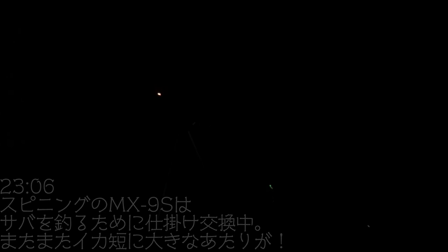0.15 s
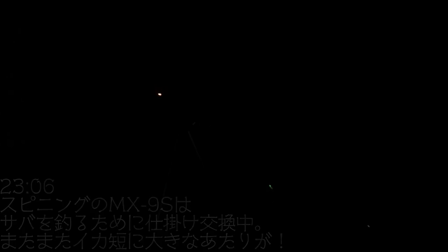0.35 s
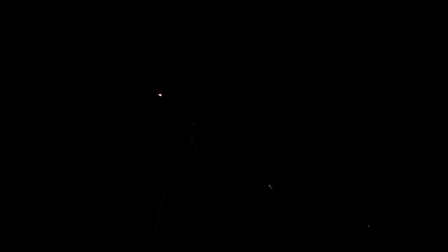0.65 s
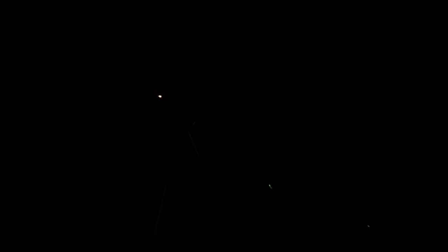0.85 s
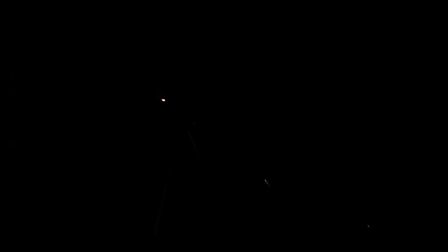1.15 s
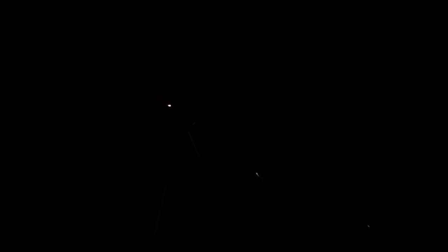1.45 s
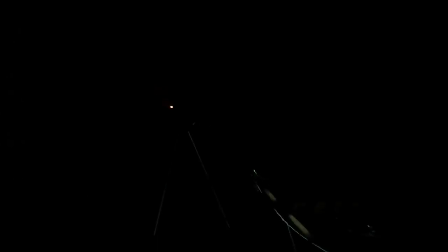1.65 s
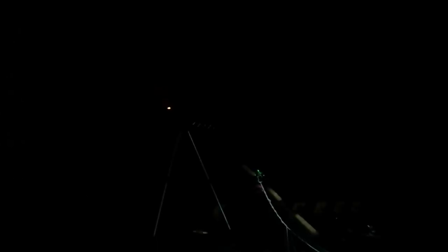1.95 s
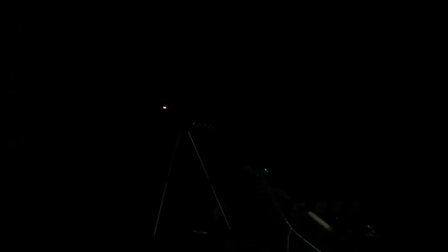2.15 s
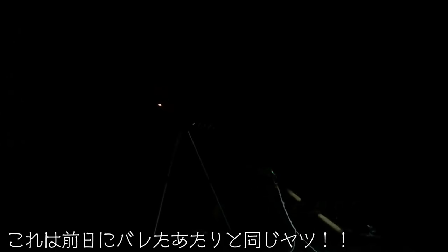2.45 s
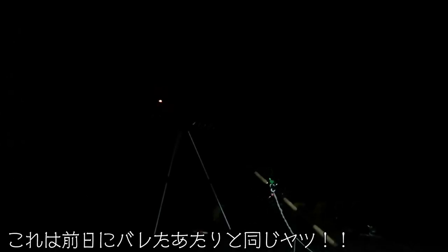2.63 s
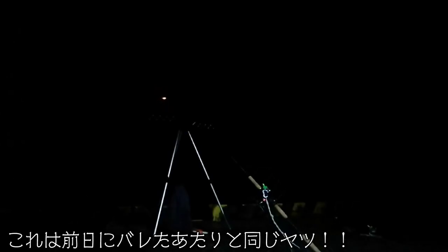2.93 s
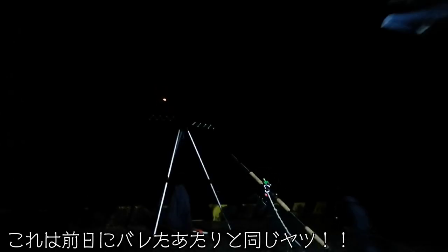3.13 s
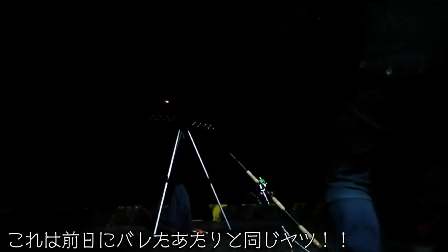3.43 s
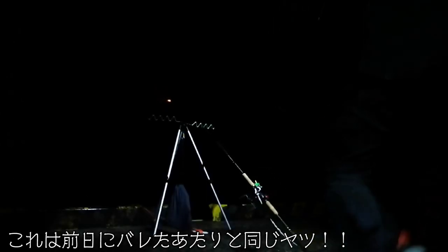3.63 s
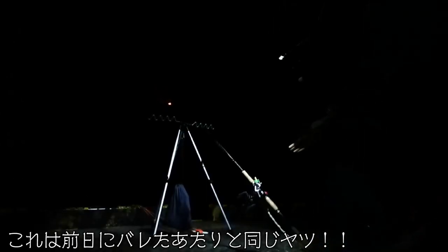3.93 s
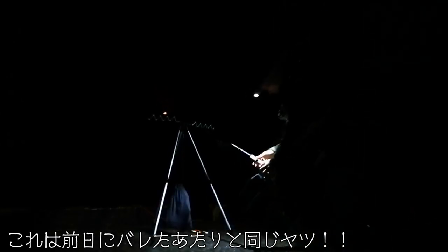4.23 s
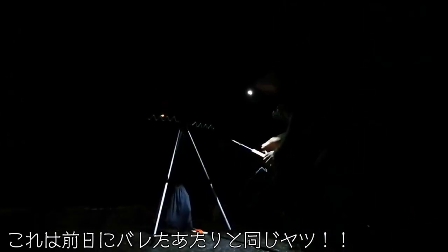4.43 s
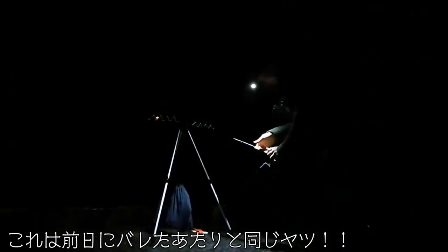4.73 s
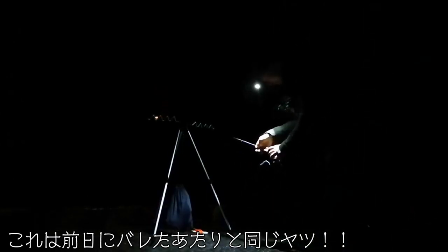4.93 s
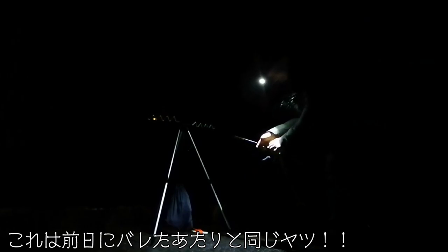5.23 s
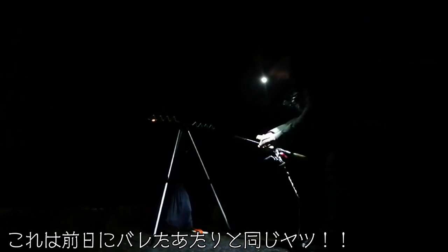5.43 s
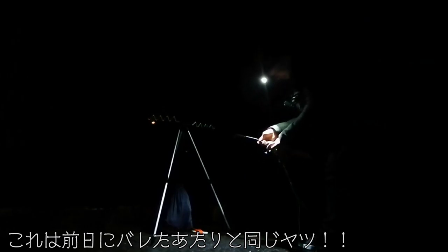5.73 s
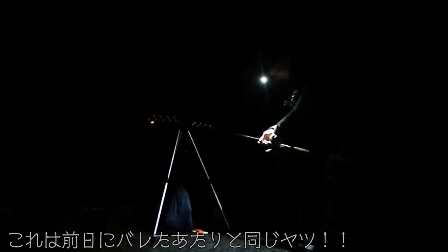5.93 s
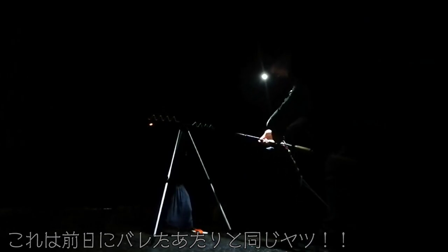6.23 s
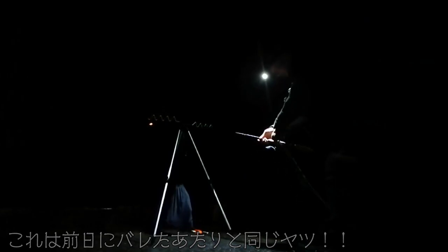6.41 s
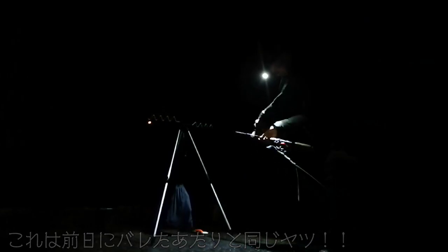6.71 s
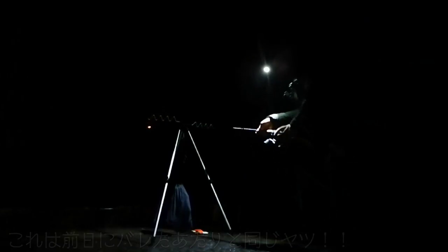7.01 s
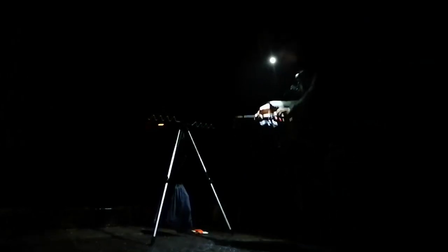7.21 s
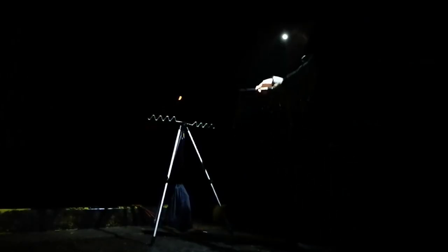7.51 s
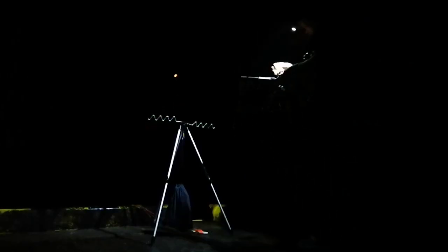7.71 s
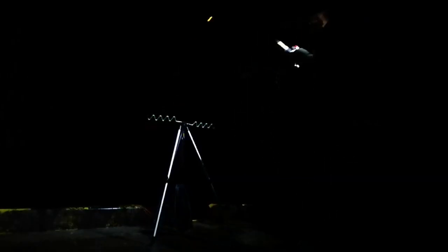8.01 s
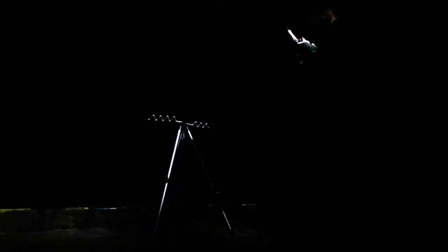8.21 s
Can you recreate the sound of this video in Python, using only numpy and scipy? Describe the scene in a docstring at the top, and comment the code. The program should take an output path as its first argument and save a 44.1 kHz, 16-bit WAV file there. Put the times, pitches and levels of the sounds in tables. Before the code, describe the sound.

Ticks from a fishing reel speed into a high, throbbing buzz while small bells rattle, ending in short spurts of clicks.

```python
"""By the water at night, a fish pulls line off a reel. The drag's spring clicks over the spool's teeth,
first one by one, then as an unevenly throbbing buzz that rings the frame, spool and rim. The angler
rises with a creak, steps over and lifts the trembling rod: its lower bell rattles with the run, its
higher bell jingles under the clapper. Clothes rustle and low puffs of wind pass over a faint hiss."""
import sys
import numpy as np
from scipy import signal
from scipy.fft import rfft, irfft, next_fast_len
from scipy.io import wavfile
from scipy.ndimage import uniform_filter1d, map_coordinates

SR = 44100
rng = np.random.default_rng(int(sys.argv[2]) if len(sys.argv) > 2 else 0)


def wav_record(signal):
    """Record a signal, one row per channel, as 16-bit PCM in the file named by sys.argv[1]."""
    frames = np.transpose(np.atleast_2d(signal))
    bounded = np.clip(frames, -1, 1)
    # unit amplitude maps onto the largest positive 16-bit level
    quanta = np.round(bounded * 32767).astype(np.int16)
    wavfile.write(sys.argv[1], SR, quanta)


N = 368805

# Resonances of the reel's parts. Each row: centre in Hz, width in Hz, gain in dB.
SPOOL_MODES = [(2794, 175, -5), (3350, 490, 1), (3448, 253, 7), (3740, 140, -0.5)]
RIM_MODES = [(4023, 457, -4.5), (4538, 490, -7.5), (4803, 190, -7), (5520, 360, -11.5)]
SPRING_MODES = [(7020, 500, -0.5), (7890, 470, -3), (8600, 510, -7)]
SPRING_TIP_MODES = [(9240, 255, 4), (10080, 1450, -5), (12300, 3200, -14.5), (14360, 490, -13.5)]
# How hard the running line shakes the rod. Each row: time in seconds, spool level in dB,
# lower bell against the spool in dB, pitch of that bell in Hz.
LINE_PULL = [(0.8, -49.5, -6, 3060), (1.12, -34.5, -4, 3030), (1.42, -35, -1.5, 3026), (1.66, -37, 3, 2952),
             (1.78, -45.5, 3.5, 3027), (2.06, -53, 2, 3000), (2.2, -51.5, 14.5, 2948),
             (2.5, -52.5, -2.5, 2995), (2.94, -42.5, -11, 3130), (3.02, -45.5, -15, 3117),
             (3.12, -41.5, -12, 3090), (3.3, -52, 0.5, 3020), (3.52, -53, -2, 3004), (3.66, -44, -9, 3045),
             (3.74, -39.5, -5, 3079), (4.11, -41, 3.5, 3029), (4.29, -54.5, 13.5, 3014),
             (4.35, -54.5, 1, 2952), (5.24, -56, 2, 2965), (5.84, -50.5, -9.5, 3000), (5.9, -49, 2, 3150),
             (6.2, -56, 9, 3136), (6.5, -52.5, 5.5, 3149), (6.82, -54, -1, 3150), (6.89, -70, 3, 3150)]


def amp(db):
    """Gain of a level in dB."""
    return 10 ** (np.asarray(db) / 20)


def unit(x):
    """x at rms 1."""
    return x / np.sqrt(np.mean(x ** 2) + 1e-20)


def curves(rows, outside=None):
    """One value per sample for each column after the time."""
    s, *cols = np.transpose(rows)
    return np.array([np.interp(np.arange(N) / SR, s, c, outside, outside) for c in cols])


def wobble(rate):
    """A smooth random curve, rate knots a second."""
    return map_coordinates(rng.standard_normal(int(N * rate / SR) + 4), [np.arange(N) * rate / SR])


def swell(start, length, lean):
    """One smooth rise and fall, peak 1; lean under 1 peaks early."""
    u = np.clip((np.arange(N) / SR - start) / length, 0, 1)
    return np.sin(np.pi * u ** lean) ** 2


def even_hits(bouts, scatter_db):
    """Evenly spaced hits of scattered size. Each row out: seconds, dB, the bout's further columns."""
    hits, chance = [], rng.standard_normal((len(bouts), 30))
    for (first, last, rate, first_db, last_db, *rest), scatter in zip(bouts, chance):
        count = round((last - first) * rate) + 1
        times, levels = np.linspace(first, last, count), np.linspace(first_db, last_db, count)
        hits += [(s, db + scatter_db * z, *rest) for s, db, z in zip(times, levels, scatter)]
    return hits


def filtered(x, response):
    """x through a complex frequency response."""
    size = next_fast_len(N + SR // 2)
    return irfft(rfft(x, size) * response(np.fft.rfftfreq(size, 1 / SR)), size)[..., :N]


def resonant(x, modes):
    """x through parallel resonances of alternating polarity."""
    return filtered(x, lambda f: sum((-1) ** k * amp(db) * 1j * f * w / (hz * hz - f * f + 1j * f * w)
                                     for k, (hz, w, db) in enumerate(modes)))


def steep(x, modes):
    """Resonances with dark skirts: a broad band around them cuts the rest, twice."""
    low, high = modes[0][0], modes[-1][0]
    band = [(np.sqrt(low * high), 1.6 * (high - low) + 600, 0)]
    return resonant(resonant(resonant(x, modes), band), band)


def hiss(spectrum):
    """Noise of rms 1 with the given spectrum."""
    hz, db = np.transpose(spectrum)
    white = rng.standard_normal(N)
    return unit(filtered(white, lambda f: amp(np.interp(np.log(f + 1), np.log(hz + 1), db))))


def patchy(x, depth_db):
    """Drifting colour: slow random patches of gain over time and frequency."""
    spectra = signal.stft(x, nperseg=512)[2]
    patches = uniform_filter1d(rng.standard_normal(spectra.shape), size=4, axis=0)
    patches = uniform_filter1d(patches, size=40, axis=1)
    return signal.istft(spectra * amp(depth_db * unit(patches)), nperseg=512)[1][:N]


def thud(hz, t60, q):
    """A burst of noise around one broad resonance, peak 1."""
    t = np.arange(SR // 6) / SR
    b, a = signal.iirpeak(hz, q, SR)
    burst = amp(-60 * t / t60) * rng.standard_normal(len(t))
    burst = signal.lfilter(b, a, signal.lfilter(b, a, burst))
    return burst / np.abs(burst).max()


def chatter(blows, t60, tail_db, tail_t60):
    """Each blow becomes a noisy burst of tiny bounces, with a weak longer rattle after it."""
    t = np.arange(SR // 10) / SR
    shape = (amp(-60 * t / t60) + amp(tail_db - 60 * t / tail_t60)) * (1 - np.exp(-t / 0.00029))
    return signal.fftconvolve(blows, shape)[:N] * rng.standard_normal(N)


def ringing(blows, pitch, t60):
    """One damped note of moving pitch, kicked at a chance phase by every blow; rms 1."""
    t = np.arange(SR // 8) / SR
    kicks = blows * np.exp(2j * np.pi * rng.random(N))
    rings = signal.fftconvolve(kicks, amp(-60 * t / t60) * (1 - np.exp(-t / 0.00039)) ** 2)[:N]
    return unit(np.real(rings * np.exp(2j * np.pi * np.cumsum(pitch) / SR)))


def night_hiss():
    """Faint stereo hiss that fades in, then slowly gets quieter."""
    # Colour of the hiss. Each row: frequency in Hz, relative level in dB.
    colour = [(18, -35), (30, -11), (108, -14.5), (126, -13.5), (576, -16), (656, -9), (1360, -15.5),
              (1520, -15), (1730, -11.5), (3880, -8), (15500, -31.5)]
    # The fade of the hiss. Each row: time in seconds, level in dB.
    fade = [(0, -85.5), (.3, -80.5), (1.5, -65.5), (8.36, -79)]
    mid = amp(curves(fade)[0]) * hiss(colour)
    side = amp(-92) * hiss(colour)
    return np.array([mid + side, mid - side])


def wind():
    """Three low, fluttering puffs near the end."""
    # The puffs. Each row: start in seconds, length in seconds, level in dB.
    puffs = [(7.257, 0.17, -66.5), (7.397, 0.17, -70), (7.644, 0.24, -55)]
    # Colour of the buffeting. Each row: frequency in Hz, relative level in dB.
    colour = [(12, -41.5), (20, -10), (75, 0), (114, -7), (203, -23), (230, -31.5), (400, -32.5),
              (520, -71), (880, -120)]
    gusts = sum(amp(db) * swell(s, length, lean=0.71) for s, length, db in puffs)
    flutter = amp(4.5 * wobble(30))
    return gusts * unit(flutter * hiss(colour))


def clothes():
    """The angler's clothes rustle over a low rumble of movement."""
    # The movement. Each row: time in seconds, rustle in dB, rumble in dB.
    movement = [(0.3, -110, -102), (0.54, -77.5, -87), (0.78, -75, -88), (1.01, -59.5, -78),
                (1.2, -59, -67.5), (1.44, -57, -73), (1.62, -72, -81.5), (2.4, -73, -86), (2.65, -70, -74),
                (2.78, -71, -81), (3.74, -71, -76), (4.21, -70.5, -84), (5.69, -73.5, -80),
                (6.69, -71.5, -81.5), (7.0, -84, -89), (7.184, -70, -89), (7.374, -79, -85),
                (8.36, -89, -90.5)]
    # Colours of rustle and rumble. Each row: frequency in Hz, relative level in dB.
    cloth_colour = [(88, -32), (150, -9.5), (286, -11.5), (369, -3), (985, 0.5), (1080, 0.5), (1600, 3.5),
                    (2080, -20), (3520, -120)]
    rumble_colour = [(12, -28), (20, 10.5), (38, -12.5), (91, -13), (226, -9), (300, -7.5), (390, -34.5),
                     (660, -120)]
    rustle, rumble = amp(curves(movement))
    return rustle * patchy(hiss(cloth_colour), depth_db=1.0) + rumble * hiss(rumble_colour)


def steps_and_tackle():
    """Steps and bumps knock over a low thump; the tackle snaps sharply."""
    # Steps and bumps. Each row: start in seconds, peak in dB, centre in Hz, t60 in seconds, thump in dB.
    knocks = [(1.116, -38.5, 850, 0.08, -43.5), (1.333, -43.5, 1324, 0.06, -72),
              (1.363, -41.5, 390.5, 0.054, -78), (1.466, -43, 820, 0.096, -68),
              (1.519, -50, 380, 0.09, -64), (1.884, -37.5, 790, 0.1, -53.5),
              (2.593, -42, 617, 0.056, -44.5), (2.719, -42, 1396, 0.08, -61),
              (2.753, -61, 774.7, 0.0538, -69), (2.946, -53, 1050, 0.13, -83),
              (3.182, -49.5, 1303, 0.09, -52), (3.726, -61, 297, 0.051, -55.5),
              (4.289, -77, 713, 0.06, -66)]
    # Snaps of tackle. Each row: start in seconds, peak in dB, centre in Hz.
    snaps = [(2.726, -38, 6300), (3.7428, -19.5, 2516), (3.7408, -25.5, 6023), (7.2008, -23, 5670),
             (7.204, -24.5, 8560), (7.26, -25, 4172)]
    out = np.zeros(N + SR)
    for s, db, hz, t60, thump_db in knocks:
        knock = amp(db) * thud(hz, t60, q=1.42) + amp(thump_db) * thud(hz=248, t60=0.11, q=0.9)
        out[round(s * SR):][:len(knock)] += knock
    for s, db, hz in snaps:
        snap = amp(db) * thud(hz, t60=0.013, q=3.2)
        out[round(s * SR):][:len(snap)] += snap
    return out[:N]


def creak():
    """A short sagging tone with a strong third partial, as the angler rises."""
    # The creak's glide. Each row: time in seconds, pitch in Hz, level in dB.
    glide = [(1.03, 336.6, -79), (1.04, 332, -51), (1.07, 296, -56.5), (1.11, 274, -53), (1.125, 290, -99)]
    pitch, db = curves(glide)[0], curves(glide, outside=-140)[1]
    phase = 2 * np.pi * np.cumsum(pitch) / SR
    return amp(db) * (np.sin(phase) + amp(-14) * np.sin(2 * phase) + amp(-3) * np.sin(3 * phase))


def rod_tremble():
    """Envelope of the rod's jolts: each swells quickly and dies away."""
    # Bouts of jolts. Each row: first and last time in seconds, jolts a second, first and last dB.
    bouts = [(1.038, 1.323, 24.5, -35, -45), (1.416, 1.4506, 29, -29, -29), (1.5136, 1.5888, 13, -54, -30),
             (1.6322, 1.8088, 22.6, -22, -30.5), (1.8427, 1.8821, 25, -23.5, -27),
             (1.948, 2.13, 22, -31, -41), (2.1909, 2.2653, 27, -41, -32.5),
             (2.311, 2.3555, 45, -29.5, -31.5), (2.3892, 2.591, 20, -39, -38),
             (2.6473, 2.6953, 21, -32.5, -32.5), (2.74, 2.794, 18, -48, -44),
             (2.8439, 2.9344, 22, -35, -26.5), (3.0583, 3.1543, 21, -43, -32.5),
             (3.214, 3.2644, 20, -53, -57), (3.7182, 3.8378, 16.7, -43, -25),
             (3.888, 4.0332, 20.6, -25, -28), (4.0701, 4.2944, 26.7, -24.5, -26),
             (5.9938, 6.2976, 23, -28.5, -30), (6.3928, 6.5094, 34, -35.5, -29.5),
             (6.56, 6.6867, 24, -47, -43), (6.7261, 6.8099, 24, -36, -54)]
    rise_s, lead_s = 0.01, 0.0046
    u = np.arange(SR // 8) / SR / rise_s
    s, db = np.transpose(even_hits(bouts, scatter_db=1.0))
    at = np.round(s * SR).astype(int) - round(lead_s * SR)
    return signal.fftconvolve(np.bincount(at, amp(db), N), (u * np.exp(1 - u)) ** 2)[:N]


def lower_bell(blows, jolts):
    """One note, part free and part muffled, tickled by the clicks and swelling with each jolt."""
    free_share = 0.63
    _, against_spool_db, pitch = curves(LINE_PULL)
    db = curves(LINE_PULL, outside=-140)[0] + against_spool_db
    free = ringing(blows, pitch + 35 * wobble(40), t60=0.035)
    muffled = ringing(blows, pitch + 70, t60=0.013)
    note = np.sqrt(free_share) * free + np.sqrt(1 - free_share) * muffled
    return resonant((amp(db) + amp(-9.5) * jolts) * note, modes=[(3144, 700, 0.0095)])


def higher_bell():
    """Every blow of the clapper rings the bell's modes anew and rasps."""
    # Blows of the clapper. Each row: start in seconds, strength in dB.
    strikes = [(5.8827, -7.5), (5.888, -15.5), (5.901, -19), (5.9093, -16), (5.9244, -17), (5.9447, -16),
               (5.9634, -23.5), (5.9844, -26), (6.0188, -22.5), (6.036, -27.5), (6.054, -23.5),
               (6.0886, -29.5), (6.118, -17.5), (6.1604, -43), (7.2042, -27.5), (7.2242, -19),
               (7.2293, -24), (7.2665, -30), (7.288, -28), (7.3104, -19), (7.3502, -38), (7.401, -41.5),
               (7.427, -40.5)]
    # The bell's modes. Each row: frequency in Hz, relative level in dB, t60 in seconds.
    modes = [(3860, -3.5, 0.035), (4120, 0.5, 0.099), (4040, -15.5, 0.11), (9940, -38, 0.16),
             (10500, -37.5, .12)]
    # The clapper's rasp. Each row: centre in Hz, width in Hz, gain in dB.
    rasp_bands = [(3700, 220, -11.5), (4177, 78, 9), (4930, 430, -9), (5780, 580, -15)]
    scatter_db, attack_s = 2.5, 0.003
    out, blows, t = np.zeros(N + SR), np.zeros(N), np.arange(SR // 3) / SR
    for s, db in strikes:
        ring = sum(amp(level + rng.normal(0, scatter_db) - 60 * t / t60)
                   * np.sin(2 * np.pi * (hz * t + rng.random())) for hz, level, t60 in modes)
        out[round(s * SR):][:len(t)] += amp(db - 3.5) * ring * (1 - np.exp(-t / attack_s))
        blows[round(s * SR)] = amp(db)
    rasp = chatter(blows, t60=0.07, tail_db=-10, tail_t60=0.28)
    return out[:N] + amp(-4) * steep(rasp, rasp_bands)


def drag_ticks():
    """Single teeth pass the spring as the spool creeps, then roll as it gathers speed."""
    # Single clicks. Each row: start in seconds, strength in dB.
    singles = [(0.2592, -41), (0.3166, -38), (0.3695, -40), (0.413, -36.5), (0.4463, -35.5), (0.476, -35.5),
               (0.5023, -36), (0.5244, -34.5), (0.5432, -36), (0.5594, -37.5), (0.5809, -32),
               (0.599, -36.5), (0.616, -36), (0.6333, -36), (0.6559, -32.5), (0.686, -34), (0.715, -34),
               (0.7385, -34), (6.8757, -37), (6.9034, -45), (6.9242, -45), (6.943, -41), (6.9594, -52),
               (6.98, -41.5), (7.5748, -38), (7.667, -35), (7.9848, -53)]
    # Rolls of clicks. Each row: first and last time in seconds, clicks a second, first and last dB,
    # extra drive of the spring in dB.
    rolls = [(0.756, 0.846, 66, -36.5, -38, -4), (0.8614, 0.8733, 84, -31, -30, -16),
             (0.8881, 0.9323, 68, -27, -29.5, -9), (7.1067, 7.1324, 78, -39, -31.5, -10.5),
             (7.1404, 7.1899, 121, -34, -26, -21.5), (7.5921, 7.6454, 94, -33, -36.5, -14)]
    single_spring_db = -7
    hits = [(s, db, single_spring_db) for s, db in singles] + even_hits(rolls, scatter_db=2.0)
    s, db, spring_db = np.transpose(hits)
    at = np.round(s * SR).astype(int)
    body = chatter(np.bincount(at, amp(db), N), t60=0.0081, tail_db=-12.5, tail_t60=0.075)
    spring = chatter(np.bincount(at, amp(db + spring_db), N), t60=0.0084, tail_db=-16.5, tail_t60=0.085)
    return (amp(7.5) * (steep(body, SPOOL_MODES) + steep(body, RIM_MODES))
            + amp(6.0) * steep(body, modes=[(3000, 380, 0)])
            + amp(8.5) * steep(spring, SPRING_MODES) + amp(-1) * steep(spring, SPRING_TIP_MODES))


def spool_teeth():
    """The running spool's teeth strike the spring: fast impulses of uneven timing and size."""
    # The run of the spool. Each row: time in seconds, clicks a second.
    spin = [(0.76, 68), (0.93, 72.6), (1.0, 135), (1.35, 179), (1.62, 257), (2.29, 314), (2.6, 241),
            (3.25, 209), (3.52, 150), (4.08, 297), (5.66, 345), (5.9, 260), (6.34, 280), (6.55, 394),
            (6.87, 330)]
    rate, = curves(spin)
    passing = np.flatnonzero(np.diff(np.floor(np.cumsum(rate) / SR)))
    jitter, size = rng.standard_normal((len(passing), 2)).T
    at = np.clip(passing + 0.05 * jitter * SR / rate[passing], 0, N - 1).astype(int)
    return np.bincount(at, amp(1.9 * size), N)


def buzz_flares(blows):
    """The buzz flares for a moment in one narrow band or another as the rod swings."""
    # Flares. Each row: start and length in seconds, first and last Hz, level in dB, t60 in seconds.
    flares = [(1.45, 0.38, 2280, 2100, -50.5, 0.035), (1.55, 0.64, 4280, 4200, -63, 0.026),
              (2.68, 0.53, 7100, 7050, -57, 0.011), (2.8, 0.5, 7600, 8500, -59.5, 0.0045),
              (3.0, .25, 4530, 4570, -49.5, 0.0076), (3.7, .35, 4500, 5040, -45.5, 0.0095),
              (3.75, .27, 6820, 7180, -53, 0.0056), (4.4, .5, 7390, 6700, -56, 0.005),
              (4.5, 0.53, 4120, 4363, -51.5, 0.029), (4.4, .32, 1784, 1762, -58.5, 0.045),
              (5.15, 0.38, 2054, 2055, -53.5, 0.023), (1.001, 0.43, 8000, 7660, -48, .004),
              (2.1, 0.37, 1030, 1270, -66.5, .02), (2.72, 0.16, 770, 756, -66, .03),
              (4.019, .2, 720, 690.3, -70, .03), (4.05, .13, 1140, 1140, -68.5, .03),
              (7.58, 0.12, 1100, 1290, -71.5, .015)]
    t, out = np.arange(N) / SR, np.zeros(N)
    for s, length, first_hz, last_hz, db, t60 in flares:
        pitch = np.interp(t, [s, s + length], [first_hz, last_hz])
        out += amp(db) * swell(s, length, lean=1.45) * ringing(blows, pitch, t60)
    return out


def drag_buzz(blows, jolts):
    """The clicks ring every part of the reel; the jolts press the spring harder on the teeth."""
    # The frame's resonances. Each row: centre in Hz, width in Hz, gain in dB.
    frame_modes = [(1707, 280, 3), (2410, 630, 8.5)]
    # What faces the listener as the rod swings. Each row: time in seconds, then rim, frame, spring in dB.
    facing = [(0.7, -77, -72, -79), (0.82, -58, -50, -68), (0.95, -44.5, -51, -45.5),
              (1.11, -39, -47.5, -43), (1.44, -40, -47.5, -46), (1.68, -44.5, -51, -52),
              (1.95, -52.5, -62, -57), (2.19, -53.5, -58.5, -58.5), (2.6, -56.5, -62, -66.5),
              (2.85, -53, -66, -51.5), (3.12, -49, -65.5, -57), (3.46, -55.5, -63.5, -61.5),
              (3.7, -50, -67, -61.5), (3.76, -42.5, -52, -53.5), (3.92, -45, -53, -57.5),
              (4.22, -50, -60, -56), (4.48, -53.5, -58.5, -57.5), (4.6, -45, -55.5, -52.5),
              (4.82, -50.5, -53.5, -60), (4.9, -54, -60.5, -60), (5.1, -51, -54, -61.5),
              (5.87, -55.5, -57.5, -59.5), (6.09, -54.5, -53, -58.5), (6.82, -54.5, -60, -61.5),
              (6.89, -75, -71, -71)]
    # Sizzle of the spring's tip. Each row: time in seconds, level in dB.
    sizzle = [(0.7, -88), (0.82, -63), (1.1, -52.5), (1.63, -55), (1.73, -68), (4.04, -70), (4.19, -67.5),
              (5.87, -70.5), (5.93, -58.5), (6.02, -68.5), (6.87, -70), (6.89, -79)]
    # Short late pulls. Each row: start and length in seconds, then frame, rim, spring, tip in dB.
    spurts = [(7.101, 0.19, -52.5, -67, -52, -59.5), (7.249, 0.13, -60, -62, -65.5, -68),
              (7.564, 0.15, -67, -77, -65, -80)]
    rim, frame, spring = amp(curves(facing, outside=-140))
    tip = amp(curves(sizzle, outside=-140)[0])
    spool = amp(curves(LINE_PULL, outside=-140)[0])
    pulls = sum(amp(levels)[:, None] * swell(s, length, lean=1.19) for s, length, *levels in spurts)
    frame, rim, spring, tip = np.array([frame, rim, spring, tip]) + pulls
    throb = jolts / (uniform_filter1d(jolts, size=SR // 10) + amp(-51.5))

    clicks = chatter(blows, t60=0.011, tail_db=-17, tail_t60=0.059)
    fizz = chatter(blows, t60=0.012, tail_db=-13, tail_t60=0.05)
    frame_hz = 2090 + 110 * wobble(5)
    rim_hz = 4260 + 90 * wobble(4)  # the rim's sharpest ring wanders slowly and randomly in pitch
    frame_ring = (0.67 * unit(steep(clicks, frame_modes)) + 0.46 * ringing(blows, frame_hz, t60=0.023)
                  + 0.5 * unit(steep(clicks, modes=[(6130, 600, 0)])))
    rim_ring = 0.76 * unit(steep(clicks, RIM_MODES)) + 0.45 * ringing(blows, rim_hz, t60=0.033)
    buzz = (frame * frame_ring
            + spool * (0.65 + 0.3 * throb) * unit(steep(clicks, SPOOL_MODES))
            + rim * (0.87 + 0.11 * throb) * rim_ring
            + spring * (0.91 + 0.17 * throb) * unit(steep(clicks, SPRING_MODES))
            + tip * unit(steep(fizz, SPRING_TIP_MODES)))
    return patchy(buzz, depth_db=2.5)  # the colour drifts as the rod sways


def scene():
    """Reel, bells, angler and wind sit in the centre; only the night hiss has a little width."""
    blows, jolts = spool_teeth(), rod_tremble()
    run = drag_buzz(blows, jolts) + buzz_flares(blows) + lower_bell(blows, jolts)
    rod = run + drag_ticks() + higher_bell()
    angler = steps_and_tackle() + creak() + clothes()
    return rod + angler + wind() + night_hiss()


def record(dry):
    """A very steep low-pass takes off the top of the treble."""
    cutoff_hz = 15300
    return filtered(dry, lambda hz: 1 / (1 + (hz / cutoff_hz) ** 120))


dry = scene()
out = record(dry)
wav_record(out)
```